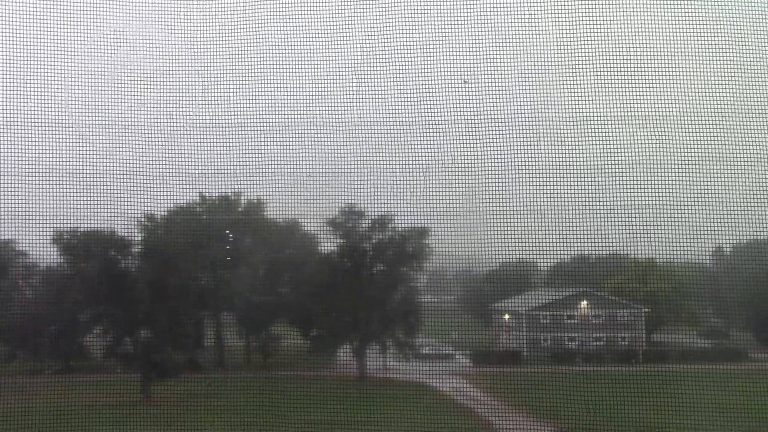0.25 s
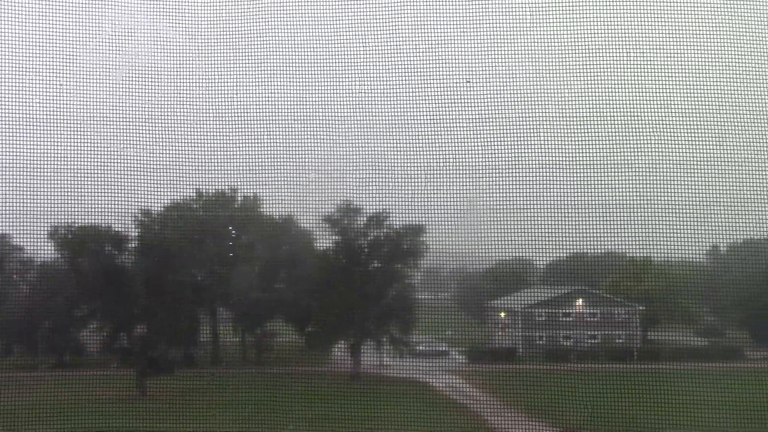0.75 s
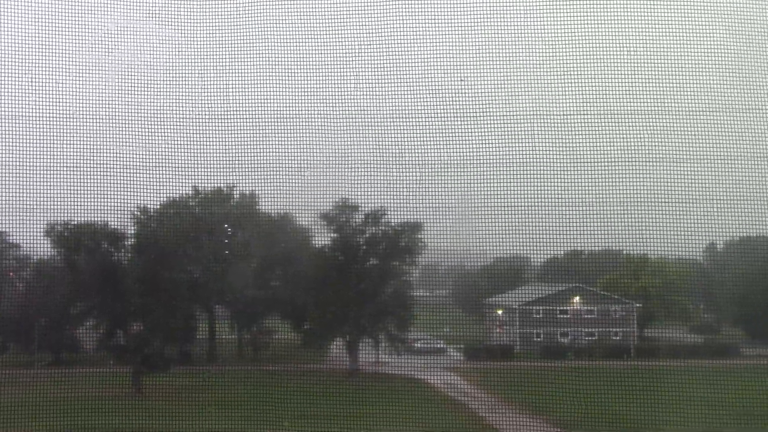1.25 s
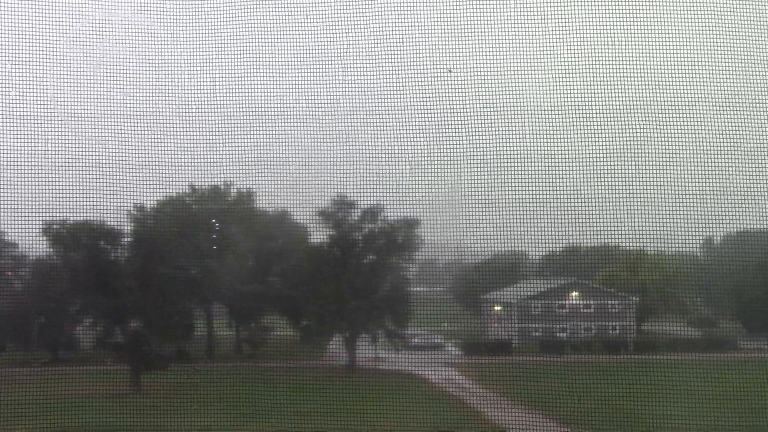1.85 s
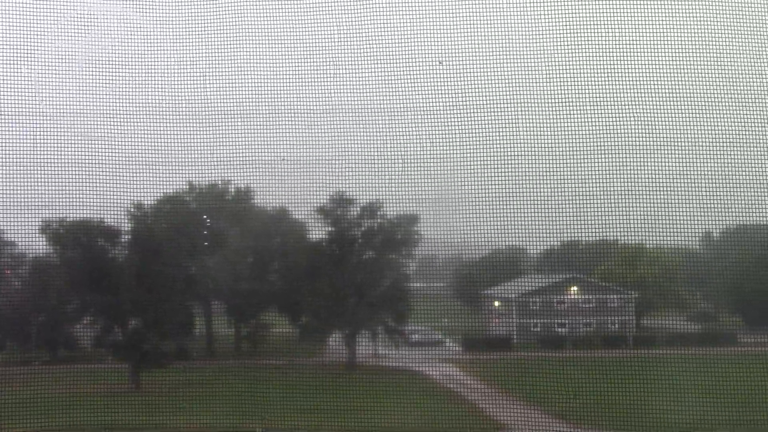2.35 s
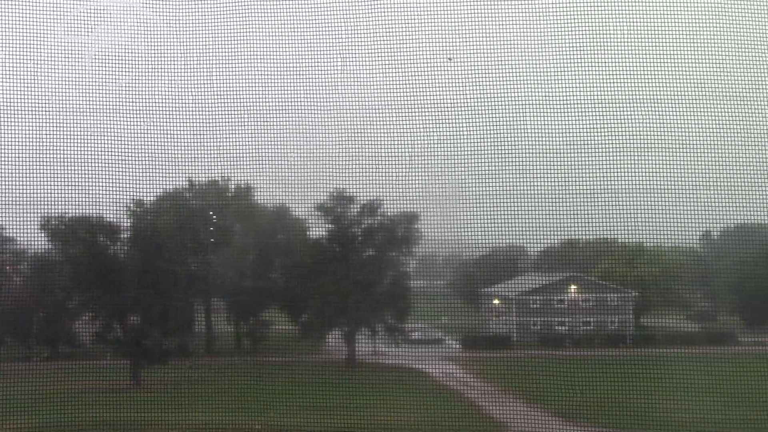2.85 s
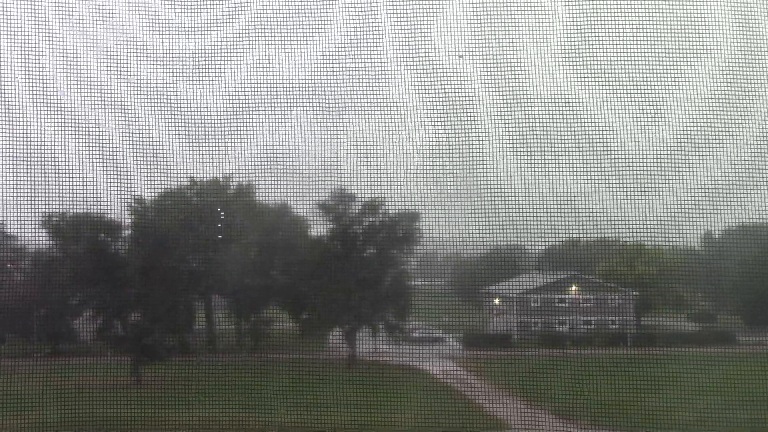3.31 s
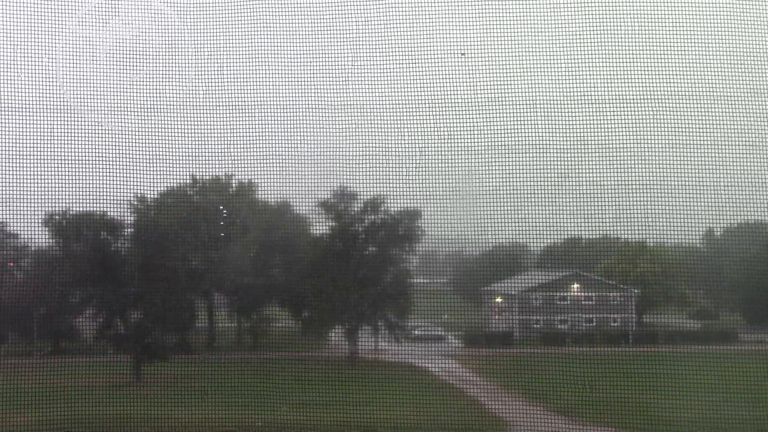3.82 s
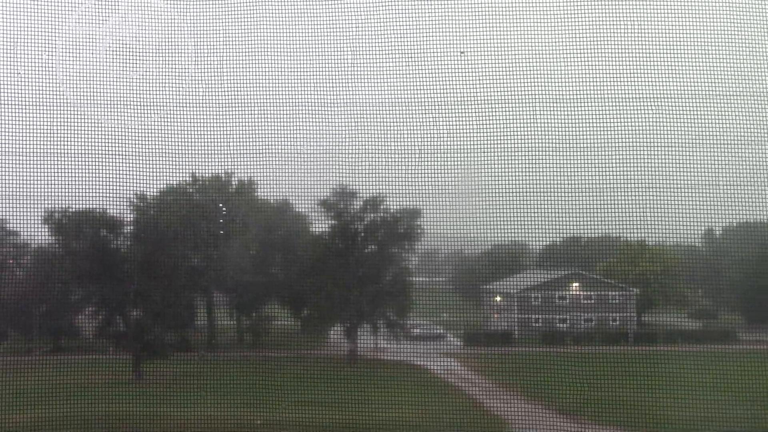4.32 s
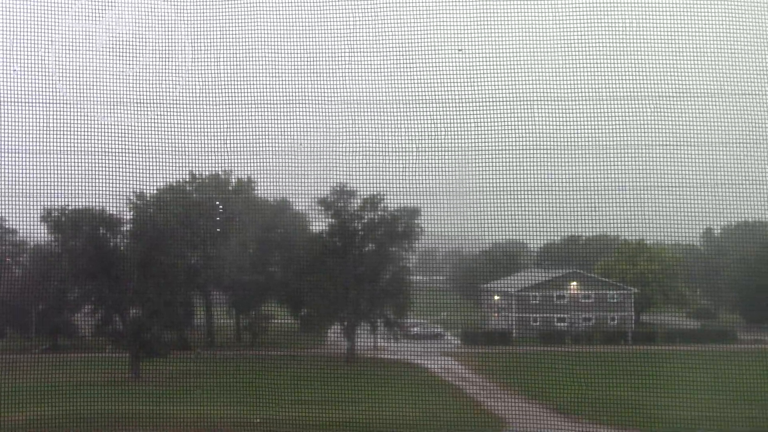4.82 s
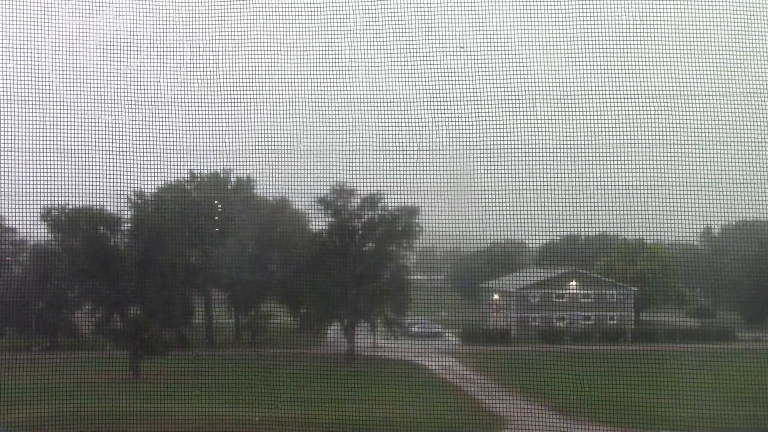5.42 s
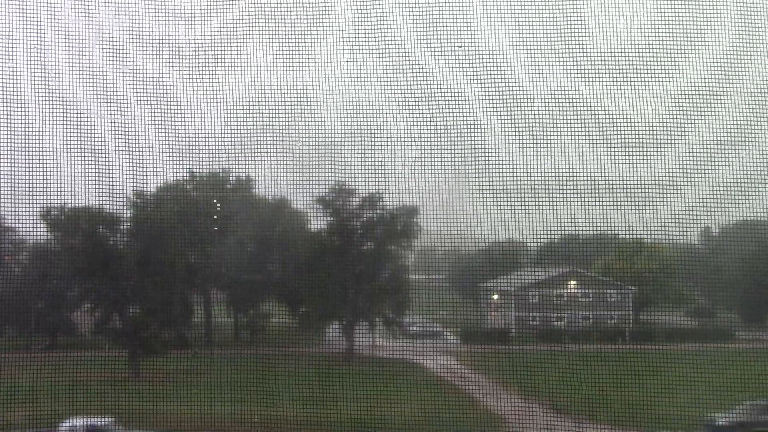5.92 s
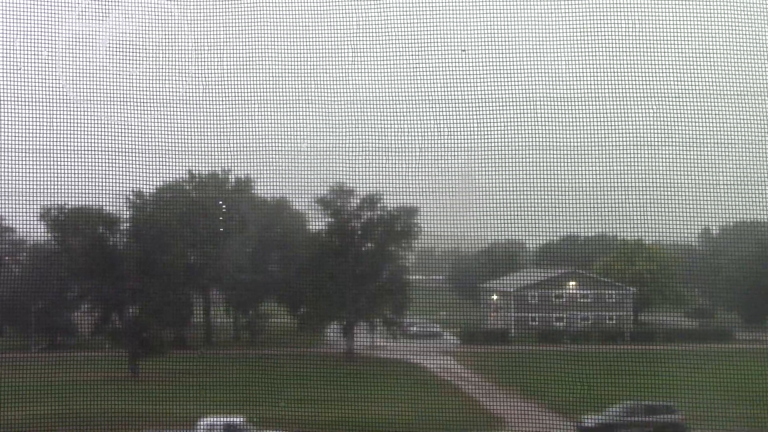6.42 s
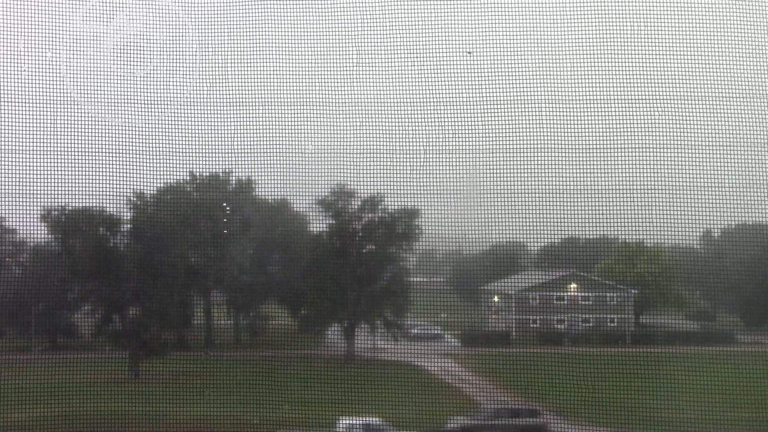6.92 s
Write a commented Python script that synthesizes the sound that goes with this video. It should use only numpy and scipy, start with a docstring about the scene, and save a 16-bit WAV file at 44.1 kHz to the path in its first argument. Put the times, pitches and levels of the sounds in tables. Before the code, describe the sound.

From inside a room at an open, screened window, steady rain washes over trees and grass. A few fat drops tap close by and one knocks on the frame early on. Distant thunder rolls, swells around two seconds and subsides while the rain thickens. After five seconds nearer thunder breaks in heavy, boxy booms that dominate and are still rumbling at the end.

```python
"""Thunder rolls over steady heavy rain, heard from a room through an open, screened window.
Far peals, crowds of filtered pulses, overlap into a roll that swells and sinks; then nearer ones break,
with booms, short pushes and rebounds, that ring the room's low modes.
The rain is a dense wash of noise and pulses that mostly thickens and eases at the end. Fat drops tap near
the microphone as short splashes, one knocks on the frame, and a faint electrical whine is a steady sine."""
import sys
import numpy as np
from scipy import signal
from scipy.fft import rfft, irfft, next_fast_len
from scipy.io import wavfile
from scipy.ndimage import uniform_filter1d, map_coordinates

SR = 44100
rng = np.random.default_rng(int(sys.argv[2]) if len(sys.argv) > 2 else 0)


def file_out(sig):
    """Save sig as 16-bit WAV at sys.argv[1]."""
    # one column per channel
    cols = np.atleast_2d(sig).T
    # limit, then scale
    lim = np.clip(cols, -1, 1)
    pcm = np.round(lim * 32767).astype(np.int16)
    wavfile.write(sys.argv[1], SR, pcm)


N = 315756


# spectra of the far rumble, the nearer growl and the nearest crackle, before the room:
# pitch_hz, relative_db (per Hz)
RUMBLE_SPECTRUM = [(20, -56), (32, -39), (42, -25.5), (50, -36), (64, -19), (106, -10), (128, -1),
                   (150, -4), (192, -10.5), (280, -11.5), (330, -15), (450, -35), (1300, -120)]
GROWL_SPECTRUM = [(60, -120), (170, -21), (265, -0.5), (322, -11), (360, 1.7), (450, -7.5), (495, -8.5),
                  (620, -20), (900, -40), (2000, -120)]
CRACKLE_SPECTRUM = [(100, -120), (400, -15.5), (520, -2.5), (660, -6), (760, 1.5), (910, 0), (1050, -10.5),
                    (1300, -20), (2000, -53), (6000, -120)]


def roll(lumps_db=1.0, flutter_db=0.77):
    """Far parts of the channel rumble, nearer ones growl, and the nearest branches add a dull crackle."""
    # kinks in the channel make every peal lumpy, and its branches make the upper layers flutter
    low, middle, high = peal_levels() * amp(lumps_db * wobble(rate=11))
    flutter = amp(flutter_db * wobble(rate=28))
    swell = np.sqrt(low ** 2 + scatter())
    rumble = swell * peal(RUMBLE_SPECTRUM, rate=900, spread_db=3, even_s=0.15)
    growl = middle * flutter * peal(GROWL_SPECTRUM, rate=1000, spread_db=2, even_s=0.091)
    crackle = high * flutter * peal(CRACKLE_SPECTRUM, rate=2000, spread_db=0.5, even_s=0.12)
    # the two microphone ports hear slightly different mixtures
    side = amp(-45) * swell * peal(RUMBLE_SPECTRUM, rate=900, spread_db=3, even_s=.1)
    side += amp(-27) * high * peal(CRACKLE_SPECTRUM, rate=1800, spread_db=2, even_s=.1)
    return rumble + growl + crackle + np.array([[1], [-1]]) * side


# peals of thunder, one from each stretch of the lightning channel, levels before lumps and flutter:
# start_s, rise_s, hold_s, rumble_db, growl_db (over rumble), crackle_db (over rumble)
PEAL_EVENTS = [(-0.06, 0.14, 0.14, -54, -1.5, -13), (0.342, 0.017, .01, -54, -8, -6.5),
               (0.46, 0.024, .01, -53, 1.5, -6), (0.605, 0.025, 0.15, -53, -10, -8.5),
               (0.78, 0.028, 0.034, -48, -4.5, -7.5), (1.015, 0.13, 0.1, -46.5, -2.5, -4.5),
               (1.278, 0.035, .06, -45, -2.5, -5.5), (1.494, 0.13, 0.3, -43.5, -3, -9),
               (1.977, 0.074, 0.1, -45.5, -5, -10.5), (2.109, 0.11, 0.066, -38, -3.5, -10.5),
               (2.27, 0.15, 0.03, -38.5, -1, -8.5), (2.49, 0.037, 0.02, -44, 0.5, -9),
               (2.714, 0.17, 0.075, -42.5, -5.5, -12), (3.175, 0.015, 0.082, -46.5, -1, -10),
               (3.36, 0.04, 0.046, -46, -9, -14), (3.6, 0.033, 0.05, -49, -2, -12),
               (3.82, 0.019, 0.15, -46, -7, -15.5), (4.171, 0.027, 0.14, -46.5, -4.5, -17),
               (4.46, 0.03, .03, -49, 0, -14), (4.596, 0.036, 0.3, -41.5, -9.5, -14.5),
               (4.927, 0.03, 0.018, -52, -3.5, -1), (5.024, 0.098, .1, -48.5, -2, -18),
               (5.25, 0.064, 0.12, -39.5, -7.5, -16.5), (5.49, 0.055, 0.026, -34.5, -10, -17.5),
               (5.615, 0.078, 0.049, -32.5, -4, -16.5), (5.891, 0.061, 0.071, -33.5, -1, -10.5),
               (6.184, 0.031, 0.024, -35.5, -5.5, -10.5), (6.299, 0.019, 0.013, -35.5, -1, -17),
               (6.592, 0.097, 0.1, -38, -3.5, -17.5), (6.84, 0.022, 0.026, -39, 0.5, -15),
               (6.986, 0.054, 0.17, -30, -8.5, -20)]


def peal_levels(release_db_per_s=23, dulling_db_per_s=14, growl_share=0.46):
    """Rumble, growl and crackle gains: each peal swells, holds and dies away, growing duller as it fades."""
    t, power = np.arange(N) / SR, np.zeros((3, N))
    # late echoes have come further: the crackle dies fastest, the growl follows a share of that
    extra_decay = dulling_db_per_s * np.array([[0], [growl_share], [1]])
    for start_s, rise_s, hold_s, rumble_db, growl_db, crackle_db in PEAL_EVENTS:
        attack = np.clip((t - start_s) / rise_s, 0, 1)
        fading_s = np.maximum(t - start_s - rise_s - hold_s, 0)
        tilt_db = np.array([[0], [growl_db], [crackle_db]]) - extra_decay * fading_s
        power += (attack * amp(rumble_db - release_db_per_s * fading_s + tilt_db)) ** 2
    return np.sqrt(power)


# standing waves of the room, at full strength in the roll and a share of it in the booms:
# pitch_hz, width_hz, lift_db
ROOM_RESONANCES = [(126, 14, 3), (176, 7, 11.5), (212, 7, 12), (283, 14, 4), (413, 8, 12), (548, 14, 4),
                   (704, 9, 11)]


def peal(spectrum, rate, spread_db, even_s):
    """A crowd of shock waves from along the lightning channel, dulled by distance, levelled over even_s."""
    # each stretch of the channel arrives with a colour of its own
    shocks = patches(impacts(rate, spread_db), 1.3, size=4096, order=4)
    in_room = filtered(shocks, lambda hz: amp(along(spectrum, hz)) * ringing(ROOM_RESONANCES, hz))
    size = max(int(even_s * SR), 64)
    power = uniform_filter1d(uniform_filter1d(in_room ** 2, size), size)
    return in_room / np.sqrt(np.abs(power) + 1e-20)


def booms(cycles=1.34, edge_db=-15, ring_db=-13, low_hz=55):
    """Each strong front is a steep push and rebound a few swings long, which leaves the room ringing."""
    track, t = np.zeros(N), np.arange(SR // 8) / SR
    for start_s, level_db, hz in fronts():
        age = t * hz / cycles
        phase = 2 * np.pi * hz * t
        envelope = age ** 2 * np.exp(2 * (1 - age))
        swing = np.sin(phase) + amp(edge_db) * np.sin(2 * phase)
        add(track, start_s, amp(level_db) * envelope * swing)

    def room(hz):
        bass_cut = hz ** 4 / (hz ** 4 + low_hz ** 4)
        return (1 + amp(ring_db) * (ringing(ROOM_RESONANCES, hz) - 1)) * bass_cut

    return filtered(track, room)


# booms that stand out of the roll, level of the first front's envelope before the room:
# start_s, level_db, pitch_hz, fronts (count), gap_s (between fronts)
BOOM_EVENTS = [(0.196, -39.5, 152, 2, 0.044), (0.219, -48, 87, 1, 0), (0.635, -43, 126, 2, .02),
               (0.832, -41, 191, 2, .045), (0.912, -52, 99, 1, 0), (1.324, -37, 143, 2, .022),
               (1.377, -37, 374, 1, 0), (1.491, -36, 153, 1, 0), (1.593, -43, 88, 1, 0),
               (1.907, -33, 143, 1, 0), (2.255, -28.5, 158.4, 2, 0.032), (2.335, -31, 140, 3, 0.032),
               (2.655, -36, 133, 2, .022), (2.988, -46, 117, 2, .035), (3.198, -38, 210, 2, .028),
               (3.462, -34, 134, 1, 0), (4.042, -38, 174, 1, 0), (4.365, -37, 131, 1, 0),
               (5.106, -34, 156, 1, 0), (5.391, -33, 182, 2, .04), (5.561, -25.5, 175, 3, 0.017),
               (5.626, -24.5, 147.4, 2, 0.023), (5.635, -39, 72, 2, .045), (5.694, -21.5, 237, 2, .028),
               (5.8099, -14, 170, 3, .0225), (5.85, -29, 72, 1, 0), (5.879, -28, 177, 1, 0),
               (5.919, -28.5, 277, 2, 0.022), (6.046, -16.5, 199, 2, .028), (6.106, -23.5, 170, 1, 0),
               (6.28, -23.5, 147, 2, 0.02), (6.569, -25, 280, 2, 0.0175), (6.753, -30.5, 214, 2, .018),
               (6.859, -19, 178.4, 2, 0.029), (6.907, -32.5, 208, 3, .0195), (7.036, -23, 238, 2, 0.034),
               (7.051, -35, 70, 1, 0), (7.135, -28, 145, 2, .018)]


def fronts(loss_db=1):
    """(s, dB, Hz) of every shock front: a boom is one or a quick volley, each weaker by loss_db."""
    return [(start_s + k * gap_s, level_db - loss_db * k, hz)
            for start_s, level_db, hz, count, gap_s in BOOM_EVENTS
            for k in range(round(count))]


def scatter(rise_s=0.045, echo_db=-17):
    """Power of the echoes that ground, trees and clouds throw back just after each strong front."""
    power, age = np.zeros(N), np.arange(SR // 2) / SR / rise_s
    for start_s, level_db, _ in fronts():
        add(power, start_s, amp(level_db + echo_db) ** 2 * age * np.exp(1 - age))
    return power


# the rainfall, before a small random drift: time_s, heaviness (0-1)
RAIN_HEAVINESS = [(0, 0.22), (1.0, 0.22), (1.4, 0.08), (2.6, 0.66), (3.1, 0.81), (6.2, 0.96), (7.16, 0.58)]
# the rain at its lightest, before the window: pitch_hz, relative_db (per Hz)
LIGHT_RAIN_SPECTRUM = [(40, -15), (110, -12.5), (400, 4), (900, 5), (1380, -3.5), (1500, -1.5), (1850, -4),
                       (2200, -5), (2450, -7.5), (3300, -8.5), (4500, -10.5), (7000, -14), (11000, -20.5),
                       (15700, -27)]
# what the heaviest rain adds to it: pitch_hz, lift_db
HEAVY_RAIN_LIFT = [(900, 2), (2200, 5.66), (3000, 6.3), (3700, 5), (4450, 5), (5200, 3.7), (7000, 2),
                   (11000, 1)]
# the rain's stereo image at the microphone: pitch_hz, side_minus_mid_db
STEREO_WIDTH = [(30, 7), (70, -16), (150, -10.5), (350, -7), (700, -13), (1400, -14), (2800, -12),
                (5600, -10.5), (10000, -12), (13000, -18.5)]
# and its lean to one side: pitch_hz, left_minus_right_db
STEREO_LEAN = [(300, 0.92), (1400, 0.58), (5000, 1.5), (10000, 0.11)]


def rain(level_db=-58):
    """The downpour comes in through the window, its stereo width and lean varying with pitch."""
    heaviness, = curves(RAIN_HEAVINESS)
    mid = patter(drops_db=-8.0, patchy_db=0.86)
    side = filtered(patter(drops_db=-2.5, patchy_db=2.0), lambda hz: amp(along(STEREO_WIDTH, hz)))
    stereo = np.array([mid + side, mid - side])

    def colour(hz):
        lean_db = np.array([[1], [-1]]) * along(STEREO_LEAN, hz) / 2
        return amp(along(LIGHT_RAIN_SPECTRUM, hz) + lean_db)

    light = unit(window(filtered(stereo, colour)))
    # heavier rain splashes more: louder and brighter, while the fine spray on top hardly changes
    heavy = filtered(light, lambda hz: amp(along(HEAVY_RAIN_LIFT, hz)))
    share = heaviness + 0.07 * wobble(rate=12)
    return amp(level_db) * ((1 - share) * light + share * heavy)


def patter(drops_db, patchy_db, soft_hz=4500):
    """Countless far drops merge into a hiss that drifts in patches; nearer, soft ones give it grain."""
    far = patches(rng.standard_normal(N), patchy_db, size=512, order=20)
    soft_drops = filtered(impacts(rate=500, spread_db=2.5), lambda hz: 1 / (1 + (hz / soft_hz) ** 4))
    return unit(walls(unit(far) + amp(drops_db) * soft_drops, t60=0.27, wet_db=-6.5))


# resonances of the window opening that colour the rain: pitch_hz, width_hz, early_lift_db, late_lift_db
WINDOW_RESONANCES = [(1510, 130, 3, 3), (1730, 100, 2, .5), (2200, 320, 3.5, 5), (2830, 200, 1.5, 1),
                     (3690, 260, 1.5, 3.5), (4420, 240, 3, 6), (5020, 200, 3, 1.5), (5630, 200, 1, 2.2)]
# when the colour slides from early to late: start_s, end_s
COLOUR_SLIDE = (4.4, 5.2)


def window(x):
    """The window opening colours the rain, and the colour slides from its early to its late form."""
    early_modes = [(hz, width, early_db) for hz, width, early_db, _ in WINDOW_RESONANCES]
    late_modes = [(hz, width, late_db) for hz, width, _, late_db in WINDOW_RESONANCES]
    early = filtered(x, lambda hz: ringing(early_modes, hz))
    late = filtered(x, lambda hz: ringing(late_modes, hz))
    share = np.interp(np.arange(N) / SR, COLOUR_SLIDE, [0, 1])
    return (1 - share) * early + share * late


# fat drops near the window, splash level before its attack and decay: start_s, level_db, pitch_hz
TAP_EVENTS = [(.196, -56, 2720), (.303, -63, 3000), (.64, -57, 1630), (.703, -61, 2820), (.766, -60, 3800),
              (.81, -65, 4400), (.932, -66, 4000), (3.942, -58, 2100), (5.55, -58, 3540), (6.31, -54, 1900),
              (6.511, -58, 3580)]


def taps(t60=0.067, width_octaves=0.2, plink_db=-8):
    """A fat drop bursts in a short splash and plinks at its own pitch."""
    track, t = np.zeros(N), np.arange(4096) / SR
    envelope = amp(-60 * t / t60) * (1 - np.exp(-t / 0.00031))
    for start_s, level_db, hz in TAP_EVENTS:
        plink = amp(plink_db) * np.sin(2 * np.pi * hz * t)
        drop = splash(hz, width_octaves, size=len(t)) + plink
        add(track, start_s, amp(level_db) * drop * envelope)
    return np.array([walls(track, t60=.2, wet_db=-14) for channel in range(2)])


# one heavy drop on the window frame: start_s, level_db (reference for ring and splash)
KNOCK_EVENT = (.818, -57)
# the frame's modes: pitch_hz, level_db (over the knock's), t60_s
FRAME_MODES = [(571, 3, .12), (1280, 7, 0.083), (1787, 6, .05), (2200, 0, 0.13), (3100, 0, .05)]


def knock(attack_s=0.0015, splash_db=7.0, splash_t60=.08, centre_hz=1500, width_octaves=0.82):
    """The drop bursts with a broad splash, and the struck window frame rings briefly."""
    track, t = np.zeros(N), np.arange(8192) / SR
    start_s, level_db = KNOCK_EVENT
    ring = sum(amp(db - 60 * t / t60) * np.sin(2 * np.pi * hz * t) for hz, db, t60 in FRAME_MODES)
    burst = amp(splash_db - 60 * t / splash_t60) * splash(centre_hz, width_octaves, size=len(t))
    add(track, start_s, amp(level_db) * (ring + burst) * (1 - np.exp(-t / attack_s)))
    return np.array([walls(track, t60=.25, wet_db=-10) for channel in range(2)])


# a faint electrical whine: pitch_hz, level_db (rms)
WHINE_TONE = (5561, -89)


def whine():
    """The electrical whine is a thin, steady sine."""
    hz, level_db = WHINE_TONE
    return np.sqrt(2) * amp(level_db) * np.sin(2 * np.pi * hz * np.arange(N) / SR)


def splash(hz, octaves, size):
    """Spray noise of rms 1 in a band around one pitch."""
    f = np.fft.rfftfreq(size, 1 / SR) + 1
    band = np.exp(-(np.log2(f / hz) / octaves) ** 2 / 2)
    return unit(irfft(rfft(rng.standard_normal(size)) * band))


def walls(x, t60, wet_db, dull_hz=3000):
    """x with a short spray of wall reflections; curtains and carpet soak up their treble."""
    t = np.arange(SR // 4) / SR
    tail = rng.standard_normal(len(t)) * amp(-60 * t / t60)
    wet = signal.fftconvolve(x, tail / np.linalg.norm(tail))[:N]
    return x + amp(wet_db) * filtered(wet, lambda hz: 1 / (1 + 1j * hz / dull_hz))


def ringing(modes, hz):
    """Causal response of a space: the direct path plus its ringing resonances."""
    return 1 + sum((amp(db) - 1) * 1j * hz * width / (centre * centre - hz * hz + 1j * hz * width)
                   for centre, width, db in modes)


def impacts(rate, spread_db):
    """Randomly timed pulses, rate a second on average, of scattered size and sign, rms 1."""
    chance, size = rng.random(N), rng.standard_normal(N)
    return unit((chance < rate / SR) * rng.choice([-1, 1], N) * amp(spread_db * size))


def patches(x, depth_db, size, order):
    """x with a drifting random colour: gain varies in patches, smoothed over order frames of size samples."""
    z = signal.stft(x, nperseg=size)[2]
    field = uniform_filter1d(rng.standard_normal(z.shape), size=7, axis=0)  # across frequency
    field = uniform_filter1d(field, size=order, axis=1)  # along time
    return signal.istft(z * amp(depth_db * unit(field)), nperseg=size)[1][:N]


def wobble(rate):
    """A smooth random curve, rate knots a second."""
    return map_coordinates(rng.standard_normal(1024), [np.arange(N) * rate / SR], mode="mirror")


def filtered(x, response):
    """x times a complex response of frequency."""
    m = next_fast_len(N + SR // 2)
    return irfft(rfft(x, m) * response(np.fft.rfftfreq(m, 1 / SR)), m)[..., :N]


def add(track, s, sound):
    """Mix a sound into the track at time s."""
    part = track[..., max(round(s * SR), 0):][..., :sound.shape[-1]]
    part += sound[..., :part.shape[-1]]


def amp(db):
    """Decibels to gain."""
    return 10 ** (np.asarray(db) / 20)


def unit(x):
    """x at rms 1."""
    return x / np.sqrt(np.mean(x ** 2) + 1e-20)


def along(points, hz):
    """(Hz, value) points read on a log frequency axis."""
    f, v = np.transpose(points)
    return np.interp(np.log(hz + 1), np.log(f + 1), v)


def curves(rows):
    """One value per sample for each column after the time."""
    s, *cols = np.transpose(rows)
    return [np.interp(np.arange(N) / SR, s, c) for c in cols]


def scene():
    """Thunder and rain together at the window."""
    return roll() + booms() + rain() + taps() + knock() + whine()


def record(dry, top_hz=15720):
    """The microphone's recorder cuts steeply above its band limit."""
    band_limit = signal.ellip(14, .05, 90, top_hz, fs=SR, output="sos")  # 0.05 dB ripple, 90 dB cut
    return signal.sosfilt(band_limit, dry)


dry = scene()
out = record(dry)
file_out(out)
```